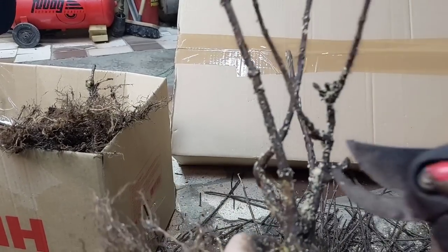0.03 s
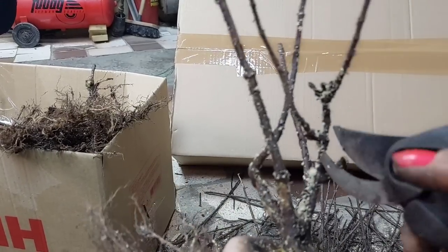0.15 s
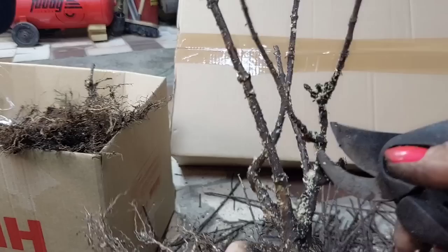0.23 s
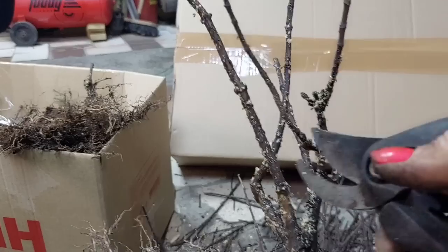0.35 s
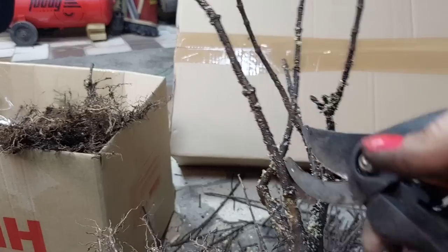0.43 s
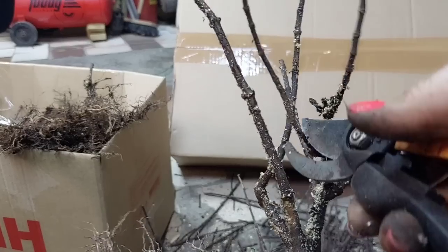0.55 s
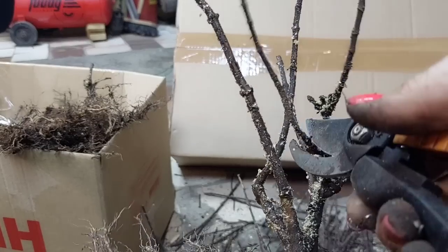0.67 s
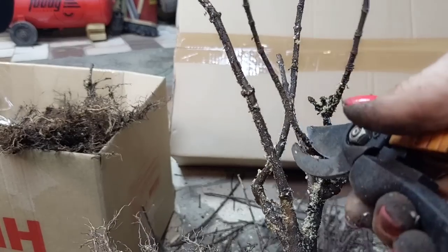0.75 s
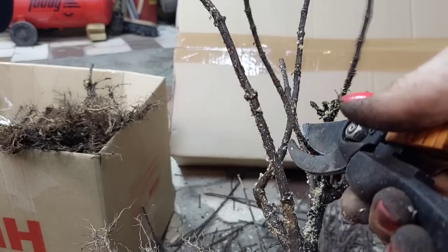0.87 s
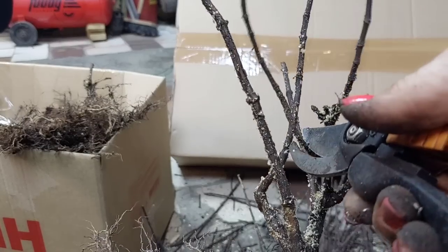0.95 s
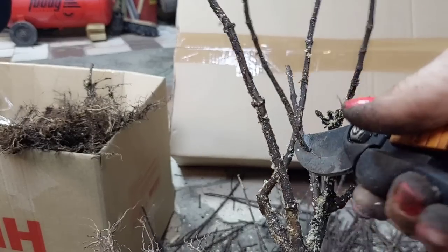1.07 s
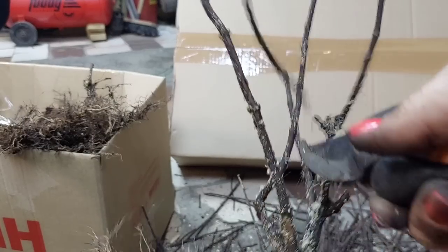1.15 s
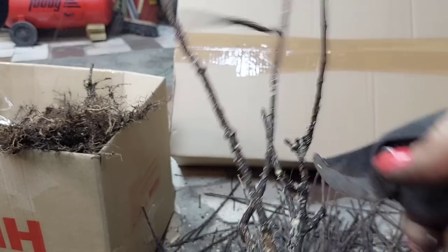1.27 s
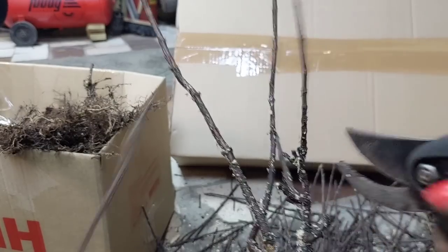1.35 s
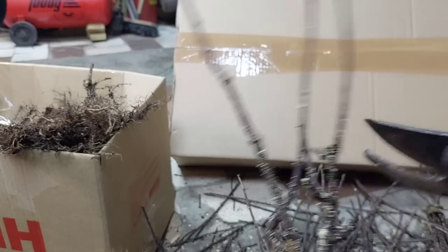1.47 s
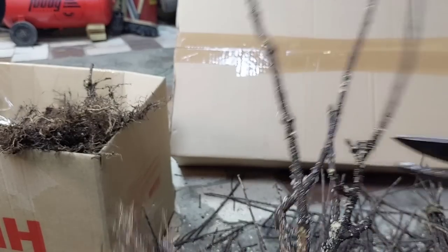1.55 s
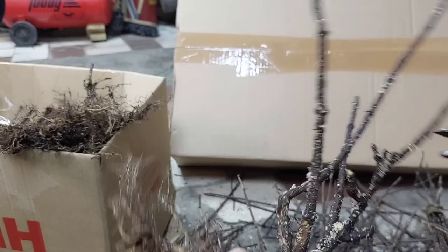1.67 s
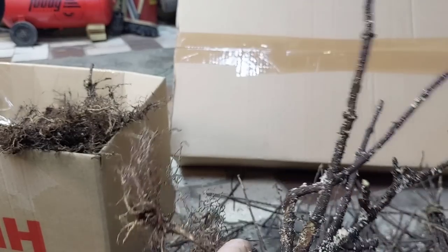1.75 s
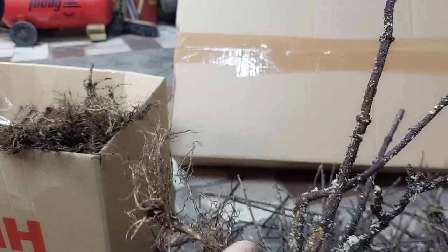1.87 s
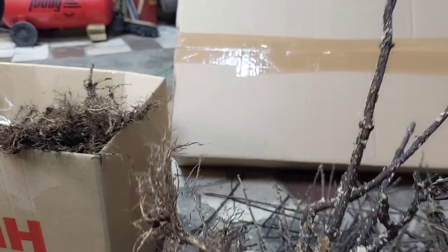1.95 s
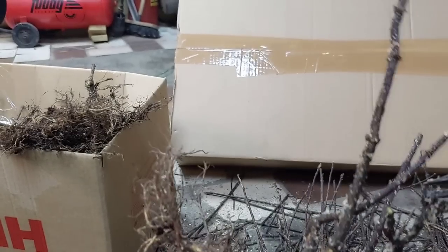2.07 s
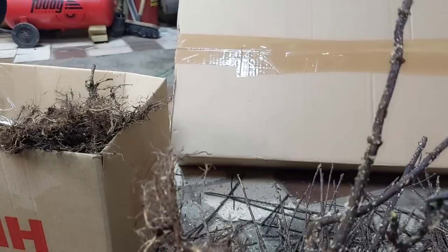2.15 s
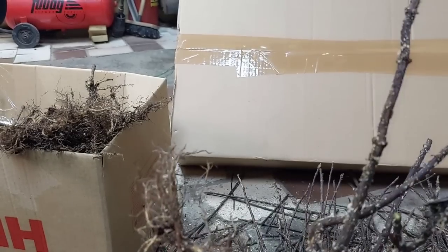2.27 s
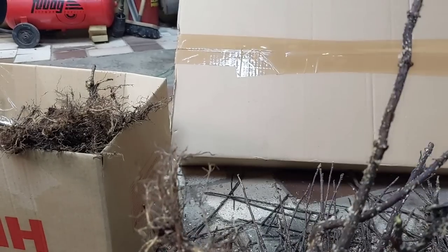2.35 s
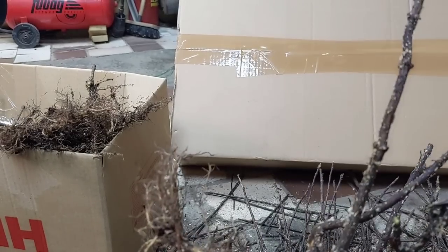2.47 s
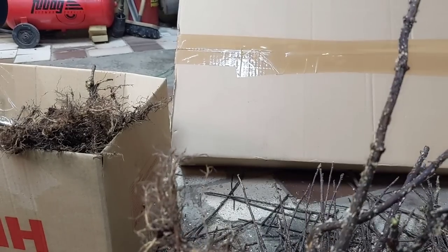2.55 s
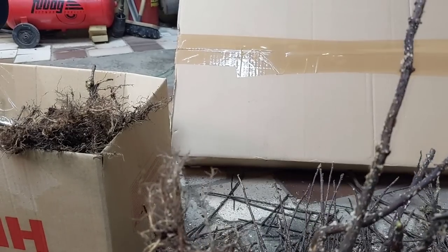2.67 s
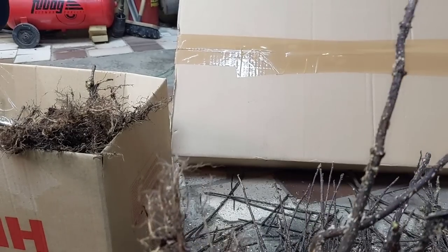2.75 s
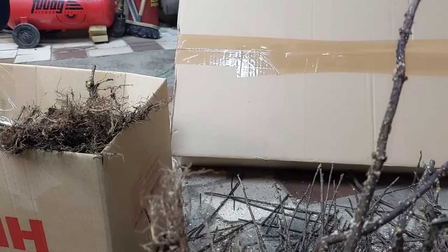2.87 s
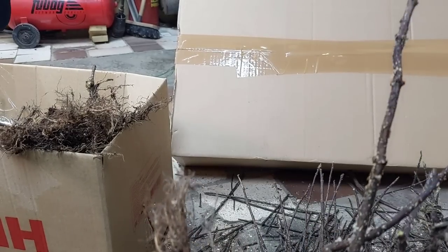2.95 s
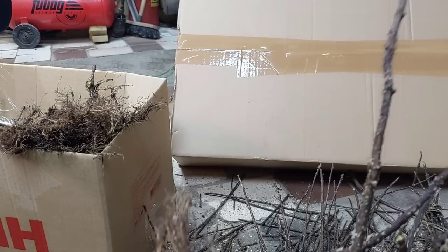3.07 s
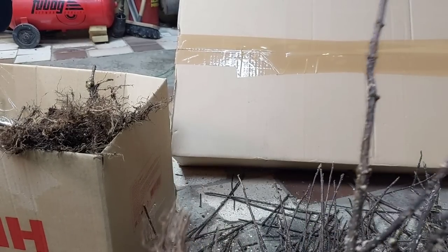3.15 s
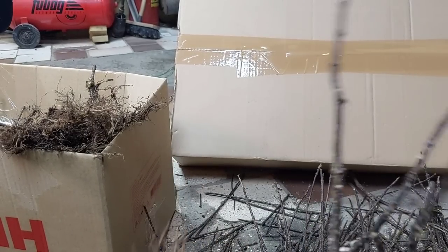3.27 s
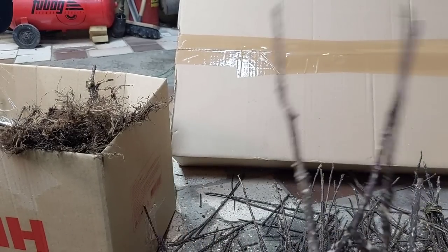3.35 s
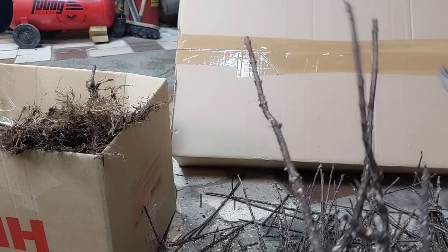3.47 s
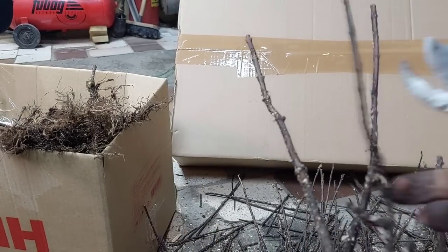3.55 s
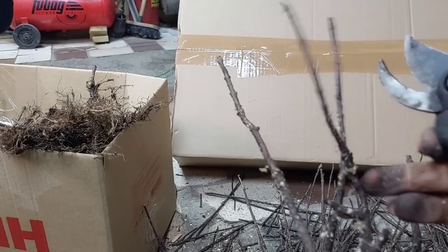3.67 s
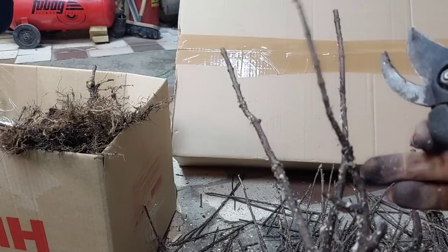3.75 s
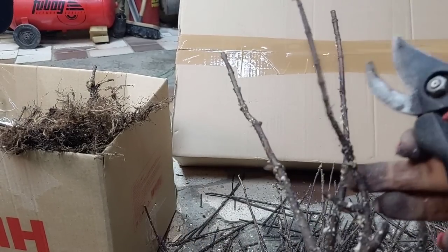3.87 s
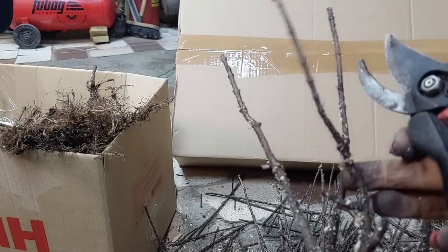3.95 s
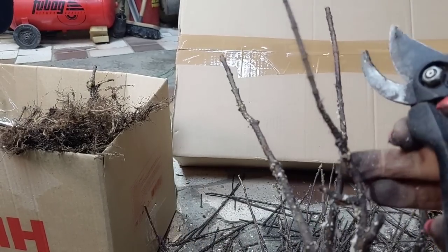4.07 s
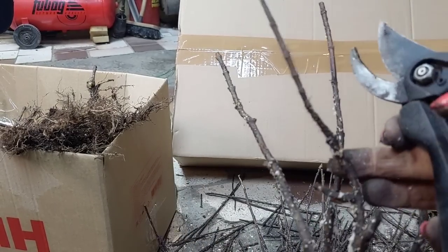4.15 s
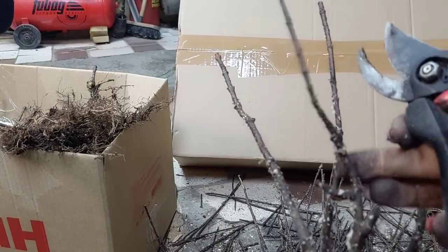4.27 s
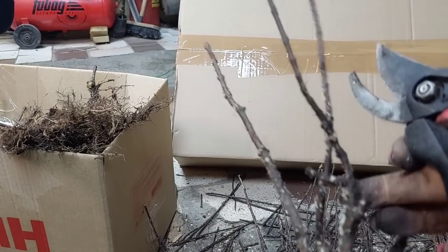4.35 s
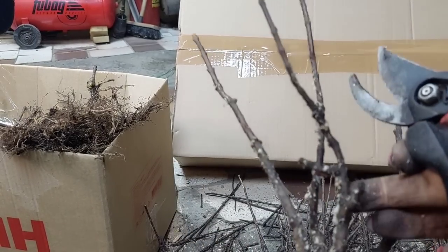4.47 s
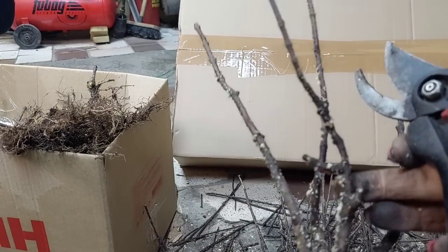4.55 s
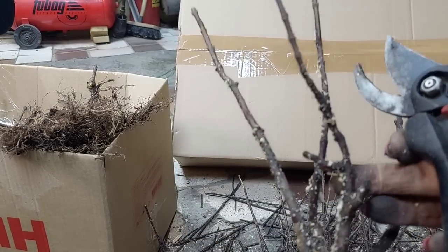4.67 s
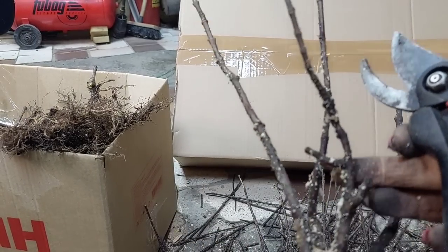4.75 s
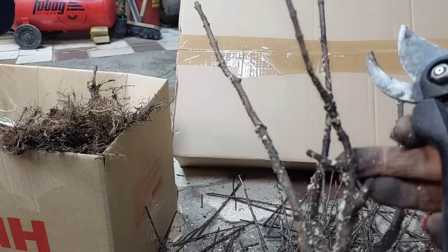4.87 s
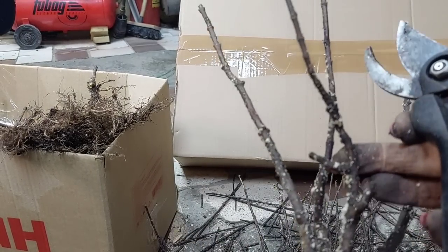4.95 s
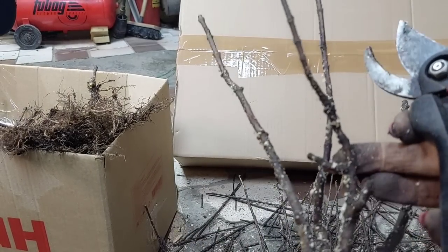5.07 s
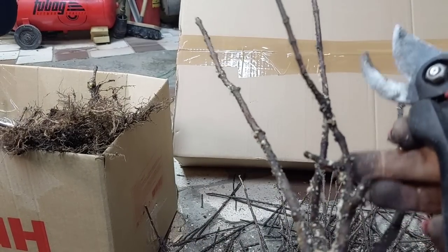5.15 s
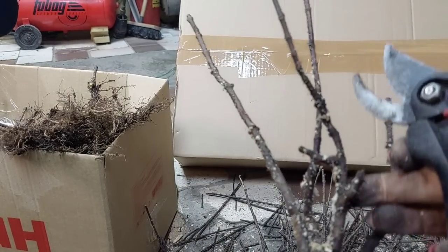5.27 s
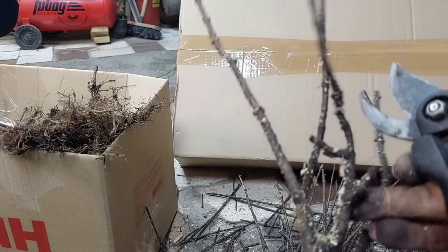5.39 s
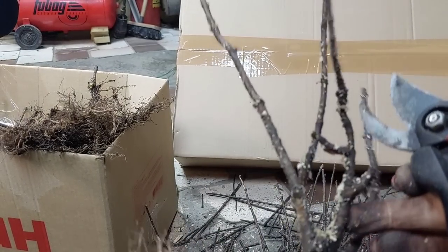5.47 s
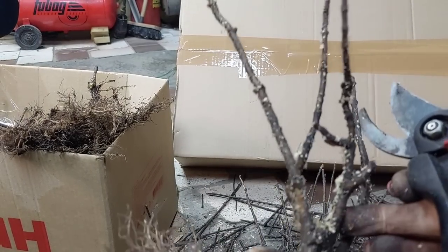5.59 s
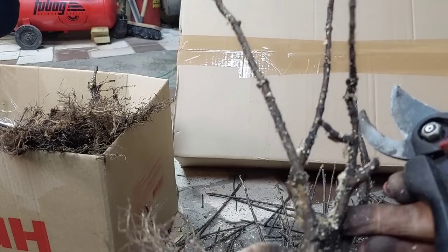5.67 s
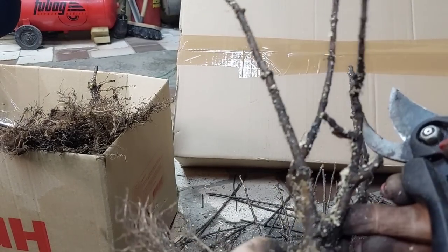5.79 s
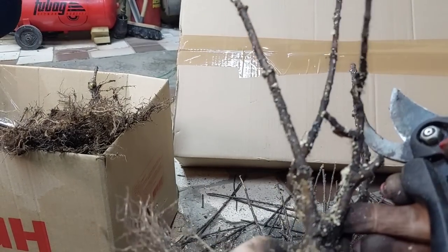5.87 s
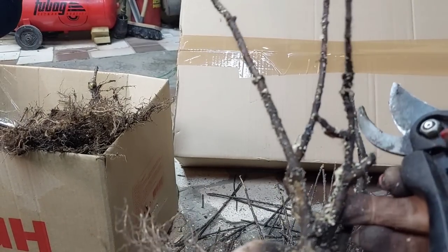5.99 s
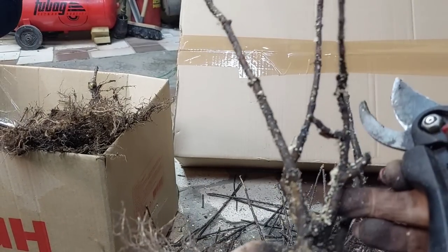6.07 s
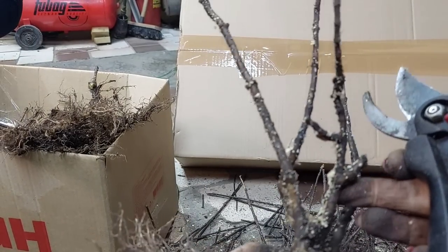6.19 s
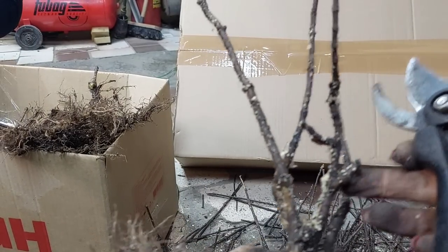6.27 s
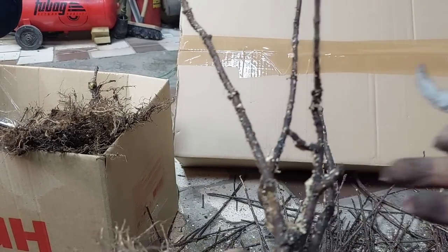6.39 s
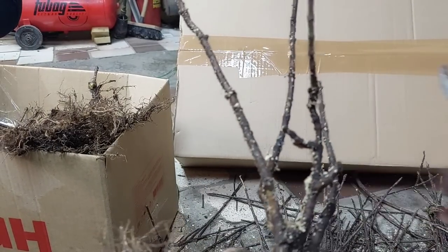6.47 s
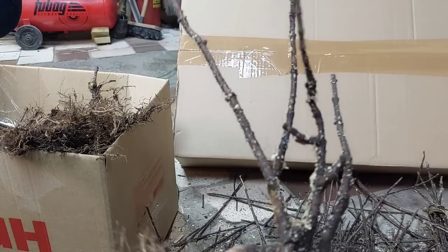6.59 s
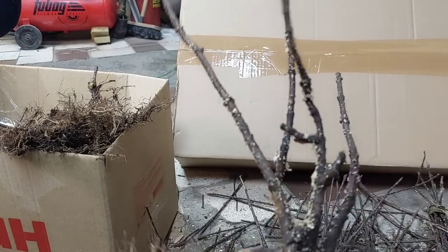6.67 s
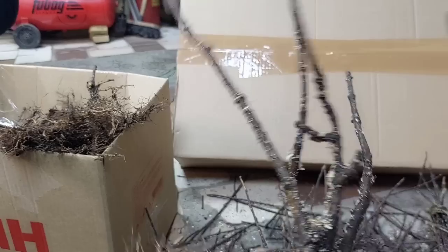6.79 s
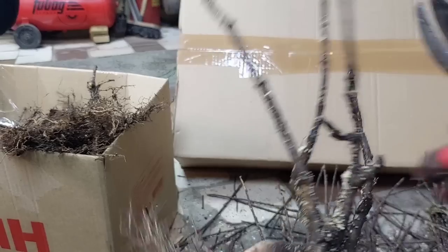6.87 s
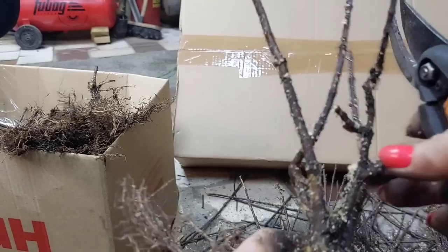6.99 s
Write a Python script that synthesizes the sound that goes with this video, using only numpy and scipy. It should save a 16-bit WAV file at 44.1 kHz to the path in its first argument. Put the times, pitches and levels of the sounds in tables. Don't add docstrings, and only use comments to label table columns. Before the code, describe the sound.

Pruners cut woody stems close by in a workshop with short reflections. A hard crack and clap comes first, by far the loudest, followed by a small springy scrape. Later a pair of lighter, brighter snips, soft twig rustle, a deep cardboard bump and a hissing, chattering drag of roots. Faint hum, rumble and thin hiss stay beneath.

```python
import sys
import numpy as np
from scipy import signal
from scipy.fft import rfft, irfft
from scipy.io import wavfile
from scipy.ndimage import uniform_filter1d

SR = 44100
rng = np.random.default_rng(int(sys.argv[2]) if len(sys.argv) > 2 else 0)


def waveform_to_disk(signal):
    frames = np.transpose(np.atleast_2d(signal))
    scaled = np.clip(frames, -1, 1) * 32767
    samples = np.round(scaled).astype(np.int16)
    wavfile.write(sys.argv[1], SR, samples)


def undo_db(level):
    steps = np.asarray(level, float) / 20
    return 10 ** steps


N = 309960


def rms_one(x):
    return x / np.sqrt(np.mean(x ** 2) + 1e-20)


def at_hz(points, hz):
    points = np.array(points)
    return np.interp(np.log(hz), np.log(points[:, 0] + 1e-9), points[:, 1])


def panned(db):
    return undo_db(np.array([db / 2, -db / 2]))


def band(x, low_hz, high_hz):
    sos = signal.butter(2, [low_hz, min(high_hz, .45 * SR)], "band", fs=SR, output="sos")
    return signal.sosfilt(sos, x)


def drift(rate_hz):
    r = np.exp(-80 * np.pi * rate_hz / SR)
    slow = signal.lfilter([1], [1, -2 * r, r * r], rng.standard_normal(N // 40 + 2002))[2000:]
    return np.interp(np.arange(N) / 40, np.arange(len(slow)), rms_one(slow))


def body(x, modes):
    out = 0
    for k, (hz, width_hz, db) in enumerate(modes):
        r = np.exp(-np.pi * max(width_hz, 5) / SR)
        a = [1, -2 * r * np.cos(2 * np.pi * hz / SR), r * r]
        out = out + (-1) ** k * undo_db(db) * signal.lfilter([1 - r, 0, r - 1], a, x)
    return out


def coloured(white, spectrum):
    hz = np.fft.rfftfreq(white.shape[-1], 1 / SR) + 1
    return rms_one(irfft(rfft(white) * undo_db(at_hz(spectrum, hz)), white.shape[-1]))


def add(out, x, s, lag_s):
    for side, late_s in enumerate((lag_s, 0)):
        i = round((s + late_s) * SR)
        out[side, i:i + x.shape[1]] += x[side, :N - i]


def swells(peak_s, db, rise_s, fall_s):
    late_s = np.arange(0, N + 16, 16) / SR - np.reshape(peak_s, (-1, 1))
    rise_s, fall_s = (np.maximum(np.reshape(v, (-1, 1)), .002) for v in (rise_s, fall_s))
    slope = np.where(late_s < 0, -late_s / rise_s, late_s / fall_s)
    return undo_db(np.reshape(db, (-1, 1)) - 20 * slope)


def summed(gains, pan_db=0.):
    sides = panned(np.zeros(len(gains)) + pan_db)[:, :, None]
    both = np.sqrt(np.sum((gains * sides) ** 2, axis=1))
    return np.array([np.interp(np.arange(N) / 16, np.arange(len(g)), g) for g in both])


# (frequency [Hz], level [dB per Hz])
LOW = [(15, -27), (30, -8), (60, -6.5), (100, -5.5), (134, -3), (175, -11.5), (250, -9), (330, -13),
       (450, -19), (600, -29), (800, -45.5), (1500, -100)]
# (frequency [Hz], level [dB per Hz])
HISS = [(300, -25), (550, -1), (900, -1), (1250, -4), (2000, -9), (3000, -12.5), (4500, -14.5), (6300, -15),
        (8200, -12.5), (10000, -15.5), (13000, -14), (16000, -15)]
# (frequency [Hz], left-right [dB])
LEAN = [(60, 13.5), (110, 11.5), (200, 8.5), (380, 6), (700, 0.5), (1290, 10.5), (2380, 13.5), (4400, 8.5),
        (8120, 1.5), (15000, -2)]
# (frequency [Hz], likeness [0 to 1])
LIKENESS = [(60, 0.97), (130, 0.35), (290, 0.26), (640, 0.78), (1410, 1), (3100, 0.89), (6820, 0.45),
            (15000, 0.55)]
# (peak time [s], level [dB], rise [s], fall [s])
SHAKES = [(3.59, -53, 0.019, 0.19), (3.7, -68, 0.11, 0.9), (4.475, -64, .015, 0.22), (4.63, -62.5, 0.18, 1),
          (5.05, -62.5, 0.48, 0.32), (.41, -66.5, 0.04, 0.34)]


def floor():
    hz = np.fft.rfftfreq(N, 1 / SR) + 1
    alike = np.clip(at_hz(LIKENESS, hz), 0, 1)
    mid, side = rfft(rng.standard_normal((2, N)))
    pair = np.sqrt(1 + alike) * mid + np.sqrt(1 - alike) * side * [[1], [-1]]
    pair = pair * panned(at_hz(LEAN, hz))
    low, hiss = (rms_one(irfft(pair * undo_db(at_hz(shape, hz)), N)) for shape in (LOW, HISS))
    shaking = np.hypot(undo_db(-71), summed(swells(*np.transpose(SHAKES))))
    rumble = shaking * undo_db(4.0 + 0.5 * drift(9.9)) * low
    return rumble + undo_db(-84.7 + 4.3 + .5 * drift(3)) * hiss


# (peak time [s], level [dB], rise and fall [s])
HUM = [(0.0, -56, 0.076), (.22, -55.5, 0.29), (.688, -57.5, 0.17), (1.08, -63, 0.43), (1.42, -67.5, 0.25),
       (1.7, -63, 0.47), (2.33, -63.5, 0.3), (2.58, -63, 0.29), (3.08, -59.5, .15), (3.33, -71.5, 0.38),
       (3.879, -67.5, 0.29), (4.324, -61.5, 0.19), (5.1, -55.5, 0.32), (5.63, -62, 0.1), (5.82, -67, 0.19),
       (6.268, -61.5, 0.46), (6.588, -59.5, .25), (7.029, -58.5, 0.31)]
# (frequency [Hz], width [Hz], level [dB])
HUM_MODE = [(66.5, 32, 0)]


def hum():
    white = rng.standard_normal((3, N))
    tone = body(body(white[0] + .5 * white[1:], HUM_MODE), HUM_MODE)
    strength = np.sqrt(uniform_filter1d(tone ** 2, size=4000) + 0.073 * np.mean(tone ** 2))
    s, db, width_s = np.transpose(HUM)
    level = np.hypot(summed(swells(s, db, width_s, width_s)), undo_db(-79))
    return level * undo_db(-1.5) * tone / strength * panned(7)[:, None]


# (time [s], pressure as bark level [dB])
HAUL = [
    [(4.462, -66), (4.474, -65), (4.6, -70), (4.74, -67), (4.9, -59.5), (5.08, -58), (5.15, -62.5),
     (5.2, -71), (5.45, -92)],
]
HAUL_MEAN_DB = -59


def hauled(db, follows):
    t, pressure_db = np.arange(N) / SR, np.full(N, -300.)
    for rows in HAUL:
        s, db_then = np.transpose(rows)
        on = (t > s[0] - .001) & (t < s[-1] + .001)
        pressure_db[on] = np.interp(t[on], s, db_then)
    pressure_db = uniform_filter1d(pressure_db, size=64)
    return undo_db(db + np.where(pressure_db > -100, follows, 1) * (pressure_db - HAUL_MEAN_DB))


# (frequency [Hz], level [dB per Hz])
DRAG = [(180, -70.5), (300, -23), (337, 12), (527, -1.5), (722, -2), (910, -4), (1330, -4), (2190, -5.5),
        (2500, -5), (2810, -6.5), (4850, -6.5), (7400, -23), (9500, -40.5), (11900, -37), (14500, -35)]


def grit(per_s, size_db):
    born = rng.random((2, N)) < per_s * undo_db(4 * drift(25)) / SR
    sizes = undo_db(size_db * np.minimum(rng.exponential(1, (2, N)), 4)) * rng.choice([-1, 1], (2, N))
    return coloured(rms_one(born * sizes) + 0.97 * rng.standard_normal((2, N)), DRAG)


# (peak time [s], bark level [dB], rise [s], fall [s], wood over bark [dB])
BRUSH = [(.778, -92, .012, 0.27, 0), (.952, -83.5, 0.2, 0.26, -6.5), (1.05, -81.5, .006, 0.32, 2),
         (1.123, -78.5, 0.27, 0.0055, -12), (1.51, -78.5, 0.029, 0.17, -4.5),
         (1.565, -74, 0.053, 0.053, -4), (2.841, -69.5, 0.004, 0.088, 4.5), (3.205, -85, 0.011, 0.33, 3),
         (3.269, -70.5, 0.12, .09, -3), (3.416, -85, 0.42, 0.28, -9), (3.63, -85, 0.11, 0.26, 5),
         (3.84, -89.5, 0.31, 0.35, 8.5), (4.169, -83.5, 0.053, 0.088, 14.5), (4.363, -72, 0.017, 0.59, -6),
         (4.456, -68.5, 0.12, 0.017, 4), (4.468, -67, .005, 0.096, 20), (5.55, -83.5, 0.15, .05, 0)]
# (peak time [s], level [dB], rise [s], fall [s], left-right [dB])
RUSTLES = [(.008, -78.5, 0.08, 0.3, 3.5), (.14, -81, 0.041, 0.37, -0.2), (1.92, -85, 0.02, .12, -7),
           (5.662, -86.5, 0.66, 0.29, -3.5), (5.86, -80, 0.24, .45, 2.5), (6.14, -81, 0.64, .2, 2.5),
           (6.33, -80, 0.36, 0.67, 3.5), (6.505, -74, 0.13, 0.15, -4), (6.7, -67.5, 0.2, 0.17, -4),
           (7.029, -78.5, 0.29, 0.11, -0.5)]
# (peak time [s], level [dB], rise [s], fall [s])
CHATTER = [(4.882, -50.5, .012, .04), (4.905, -49, 0.034, .03), (4.935, -55, .03, .02),
           (5.269, -61.5, 0.12, 0.038)]
# (frequency [Hz], width [Hz], level [dB])
CHATTER_MODES = [(710, 130, 12), (590, 100, -11.5)]
# (lowest [Hz], highest [Hz])
RUB_EDGES = [(450, 3000), (3000, 12000), (8500, 17000), (8500, 17000)]
RUB_TRIM_DB = [5, 1, 7]


def brushing():
    coarse, fine = grit(per_s=2000.0, size_db=2.5), grit(per_s=13000.0, size_db=1.5)
    layers = []
    for rub, edges, trim_db in zip((coarse, fine, coarse, fine), RUB_EDGES, [*RUB_TRIM_DB, 4]):
        layers.append(undo_db(trim_db) * rms_one(band(band(rub, *edges), *edges)))
    wood, bark, root, lone = layers
    s, db, rise_s, fall_s, woody_db = np.transpose(BRUSH)
    root_db = -77 + .7 * (db + 75)
    wood_gain = np.hypot(summed(swells(s, db + woody_db, rise_s, fall_s)), hauled(-54.5, .99))
    bark_gain = np.hypot(summed(swells(s, db, rise_s, fall_s)), hauled(HAUL_MEAN_DB, 0.93))
    root_gain = np.hypot(summed(swells(s, root_db, rise_s, fall_s)), hauled(HAUL_MEAN_DB - 4, 0.8))
    out = wood_gain * wood + bark_gain * bark + root_gain * root
    out = out + summed(swells(*np.transpose(CHATTER))) * rms_one(body(wood, CHATTER_MODES))
    *shape, pan_db = np.transpose(RUSTLES)
    rustle = summed(swells(*shape), pan_db) * lone
    return undo_db(0.3 * drift(36)) * (out * panned(1.5)[:, None] + rustle)


# (peak time [s], deep panel [dB], upper panels [dB], rise [s], fall [s])
BOOM = [(3.206, -68, -55, 0.0081, 0.097), (3.25, -72.5, -54, 0.072, 0.043), (3.591, -38, -64, 0.014, 0.15),
        (3.62, -57.5, -56, .05, 0.11), (3.67, -48, -61, 0.052, 0.039), (3.89, -66, -63, 0.11, .13),
        (4.44, -49, -55.5, 0.056, .1), (4.468, -27, -30, 0.0037, 0.1), (4.495, -38, -25.5, 0.012, 0.049),
        (4.551, -32.5, -40.5, 0.069, 0.037), (4.63, -50.5, -51.5, 0.02, 0.11),
        (4.914, -52.5, -66, 0.091, 0.085), (5.08, -40.5, -54, 0.069, 0.078), (5.18, -60, -72, 0.034, 0.12),
        (5.29, -66, -58, 0.15, 0.092)]
# (frequency [Hz], width [Hz], level [dB])
DEEP_PANEL = [(134, 11.3, 6), (180, 99, -11)]
# (frequency [Hz], width [Hz], level [dB])
UPPER_PANELS = [(257, 103, -5.5), (346.3, 33.3, 1), (423, 34, -13.5), (551.3, 10.3, -5), (710, 650, -18)]


def box_boom():
    s, deep_db, upper_db, rise_s, fall_s = np.transpose(BOOM)
    dragged = hauled(-59.5, follows=.49)
    out = 0
    for modes, db, drag in ((DEEP_PANEL, deep_db, 0), (UPPER_PANELS, upper_db, dragged)):
        white = rng.standard_normal((3, N))
        panel = band(body(white[0] + 0.51 * white[1:], modes), 72, 950)
        level = np.hypot(summed(swells(s, db, rise_s, fall_s)), drag)
        out = out + undo_db(-3.0) * level * rms_one(panel)
    return out * panned(1.0)[:, None]


# (time [s], peak level [dB], pitch [Hz], left-right [dB])
TICKS = [(0.1402, -69, 6100, 9), (0.4644, -64.5, 10000, 4), (0.555, -63.5, 8220, 10),
         (0.775, -66, 7860, 3.0), (0.925, -65.5, 6800, 16), (1.05, -50, 7140, 11), (1.07, -54.5, 5400, -3),
         (1.4956, -56, 4010, -4), (1.5597, -53.5, 6900, -2), (1.9166, -68, 11890, -15),
         (3.2037, -61, 12800, 2.5), (3.218, -54, 4855, -5), (3.726, -60.5, 9440, -2)]


def ticks():
    out, t = np.zeros((2, N)), np.arange(400) / SR
    for s, db, hz, pan_db in TICKS:
        click = rng.standard_normal((2, len(t))) * undo_db(-60 * t / 0.0098)
        tick = body(click, [(hz, .5 * hz, 0)]) + 0.16 * band(click, 3600, 13000)
        add(out, undo_db(db + 3.0) * tick / np.abs(tick).max() * panned(pan_db)[:, None], s, 0)
    return out


# (time [s], peak level [dB], time to fade 60 dB [s], left-right [dB])
KNOCKS = [(1.1496, -17, 0.05, -3.5), (2.9655, -52, 0.076, 0.1), (3.026, -38, 0.039, 5.5)]
# (frequency [Hz], level [dB per Hz])
KNOCK = [(25, -55), (50, -18), (80, -4), (125, -1), (180, -4), (330, 0), (470, -19), (590, -12), (780, -26),
         (2500, -90)]


def knocks():
    out, t = np.zeros((2, N)), np.arange(SR // 3) / SR
    for s, db, t60_s, pan_db in KNOCKS:
        white = rng.standard_normal((3, len(t)))
        thud = coloured(white[0] + 0.095 * white[1:], KNOCK)
        thud = thud * undo_db(-60 * t / t60_s) * (1 - np.exp(-t / 0.0039))
        add(out, undo_db(db) * thud / np.abs(thud).max() * panned(pan_db)[:, None], s, 0)
    return out


# (time [s], frequency [Hz], width [Hz], level [dB], fall by 20 dB [s], held within 0.005
RINGS = [(1.156, 1230, 120, -46.5, 0.1), (1.156, 2160, 200, -44.5, -1.5), (1.156, 2390, 59.9, -48.5, 0.3),
         (1.156, 3450, 160, -52, 6), (1.152, 93, 40, -40.5, 1), (1.152, 380, 90, -30.5, 0.1),
         (1.156, 4502, 120, -51.5, 0.7), (1.315, 2330, 149.6, -62, -1.5), (1.316, 1300, 200.4, -62, .05),
         (2.842, 3120, 300, -61, .04), (1.156, 5450, 400, -46, 0), (2.84, 5000, 900, -63.5, 0),
         (3.03, 2210, 90, -44, -0.5), (3.03, 5170, 299, -56.5, 7), (3.022, 2240, 150, -40, 0.3),
         (3.025, 4750, 350, -30.5, -0.33), (3.203, 798, 498, -60.5, 0.5), (3.243, 2250, 253, -58.5, -0.1),
         (3.243, 5000, 499, -52.5, -1.2), (4.47, 590, 100, -42, -2), (4.48, 200, 50, -38, -4),
         (4.92, 2600, 200, -58, .06), (5.04, 2510, 200, -55, .06), (5.07, 1340, 120, -50, .05),
         (4.469, 960, 200, -44, -1.5), (4.47, 85, 30, -48, .1)]


def rings():
    out, t = np.zeros((2, N)), np.arange(SR // 4) / SR
    for s, hz, width_hz, db, fall_s in RINGS:
        white = rng.standard_normal((3, len(t)))
        tone = rms_one(body(white[0] + 0.98 * white[1:], [(hz, width_hz, 0)]))
        fade = undo_db(db - 20 * t / np.clip(fall_s, .005, .065)) * (1 - np.exp(-t / .003))
        add(out, fade * tone, s, 0)
    return out


# (frequency [Hz], width [Hz], level [dB])
BRIGHT = [(8555, 1200, -7), (10900, 1800, -4), (12800, 5000, 0), (14400, 3100, -3), (15300, 2200, -7.5)]
# (lowest [Hz], highest [Hz])
PART_EDGES = [(1050, 2700), (3000, 7500), (7500, 16500)]
# (frequency [Hz], width [Hz], level [dB])
BLADE = [(3600, 1100, -9), (4750, 650, 1), (5400, 280, -3), (6900, 300, -4), (8373, 600, -14.5)]


def pruner(size, fade, alike, fill_db, strike, stem, blade=BLADE, pitch=1):
    parts = []
    for modes, edges in zip((stem, np.array(blade) * [pitch, 1, 1], BRIGHT), PART_EDGES):
        fibres = rng.standard_normal((2, 3, size)) * undo_db(2.0 * rng.standard_normal(size)) * fade
        blow = strike * (np.arange(size) == 0)
        ringing, crack = alike * fibres[:, :1] + fibres[:, 1:] + blow
        part = rms_one(body(ringing, modes)) + undo_db(fill_db) * rms_one(band(crack, *edges))
        lowest_hz = .85 * edges[0]
        parts.append(rms_one(band(band(part, lowest_hz, 17000), lowest_hz, 19000)))
    return parts


# (peak time [s], stem [dB], blade [dB], bright [dB], left-right [dB])
OPENING = [(1.327, -66, -68.5, -71, 3.5), (1.338, -52, -57, -66, -11), (1.343, -56, -58, -59, 1),
           (1.348, -48.5, -55, -58.5, -3.5), (3.242, -71, -64.5, -64, -3), (3.251, -68, -63, -63, -8),
           (3.259, -66, -65, -69, -6)]
# (frequency [Hz], width [Hz], level [dB])
HINGE = [(1250, 140, -2), (1510, 340, 2), (2330, 150, 3.5), (1900, 460, -18)]


def opening():
    parts = pruner(N, 1, alike=0.46, fill_db=-7.0, strike=0, stem=HINGE)
    s, *levels_db, pan_db = np.transpose(OPENING)
    slide = swells(s, 7.2, rise_s=0.0053, fall_s=0.0054)
    settle = swells(s, -13.5, rise_s=0.0053, fall_s=0.07)
    out = 0
    for db, part in zip(levels_db, parts):
        out = out + summed((slide + settle) * undo_db(db)[:, None], pan_db) * part
    return out


# (time [s], stem [dB], blade ring [dB], bright crack [dB], length [ms])
SNAPS = [(1.1359, -27, -26.5, -36, 1.3), (1.141, -44, -36, -41.5, 1.6), (1.1489, -8, -11.5, -20, 2.7),
         (1.1522, -3.5, 0, -6.5, 1.0), (1.1544, -17, -23, -35, 6.5), (2.836, -59, -58.5, -76, 26.2),
         (2.9647, -35, -21, -12.5, .75), (2.9665, -34.5, -38.5, -36.5, 8.5),
         (2.9703, -49, -31.5, -43.5, 2.297), (3.0200, -32, -38.5, -44, 13), (3.0227, -37.5, -27, -30, 6),
         (3.0266, -23.5, -10, -21, 2.3), (3.0281, -25, -20, -19, 8.5), (4.4656, -36.5, -52, -34, 5.8)]
# (time [s], left-right [dB], blade pitch [share of the usual])
PRUNER_SIDE = [(1.15, -2, 1.001), (2.84, 3.5, .98), (2.96, -6.5, 1.04), (3.03, -4.5, 0.99), (4.47, 7, 1.09)]
# (frequency [Hz], width [Hz], level [dB])
STEM = [(1235, 170, -1), (1620, 250, 0.5), (1800, 350, -3), (2305.5, 250, -.5)]
# (frequency [Hz], width [Hz], level [dB])
THIN_STEM = [(1196.4, 200, -4), (1600, 300, -12.5), (2250, 220, -0.5), (2600, 300, -9.5)]
# (frequency [Hz], width [Hz], level [dB])
THICK_BLADE = [(3670, 400, -6), (4230, 400, -9.5), (5450, 1500, -0.5), (6120, 630, -5.5),
               (8900, 940, -11.5)]


def snaps():
    out, t = np.zeros((2, N)), np.arange(1800) / SR
    held_s, held_pan_db, held_pitch = np.transpose(PRUNER_SIDE)
    lags_s = .00017, .00036, .00036
    for s, *levels_db, ms in SNAPS:
        pan_db, pitch = np.interp(s, held_s, held_pan_db), np.interp(s, held_s, held_pitch)
        stem = THIN_STEM if 2 < s < 4 else STEM
        blade = THICK_BLADE if s < 2 else BLADE
        fade = undo_db(-20 * t / (max(ms, .3) / 1000))
        parts = pruner(len(t), fade, alike=1, fill_db=-4.5, strike=8.5, stem=stem, blade=blade, pitch=pitch)
        for db, part, lag_s, lean_db in zip(levels_db, parts, lags_s, (0, 0, -4)):
            burst = undo_db(db) * part / np.abs(part).max() * panned(pan_db + lean_db)[:, None]
            add(out, burst, s, lag_s * np.sign(-pan_db))
    return out


# (frequency [Hz], time [s])
ROOM_T60 = [(200, .28), (600, .25), (1500, .225), (4000, .2), (10000, .185)]
# (frequency [Hz], level [dB])
ROOM_LEVEL = [(200, -6.5), (600, -4), (1500, -5.5), (3000, 1.5), (6000, -4), (10000, -2), (15000, -3)]


def workshop(x):
    t, edges = np.arange(SR // 2) / SR, 100 * 2 ** np.arange(0, 7.6, 1 / 3)
    white, echo = rng.standard_normal((2, 2, len(t))), 0
    late_tail = undo_db(-22 - 60 * t / .42)
    for k, (low_hz, high_hz) in enumerate(zip(edges, edges[1:])):
        hz = np.sqrt(low_hz * high_hz)
        fade = undo_db(-60 * t / at_hz(ROOM_T60, hz)) + late_tail
        echo = echo + band(white[k % 2], low_hz, high_hz) * undo_db(at_hz(ROOM_LEVEL, hz)) * fade
    echo = echo * np.clip((t - .001) / .004, 0, 1)
    return signal.fftconvolve(x, echo / np.sqrt(np.sum(echo ** 2) / 2), axes=1)[:, :N]


def scene():
    background = floor() + hum()
    soft = brushing() + box_boom() + rings() + opening()
    sharp = ticks() + knocks() + snaps()
    return background + soft + sharp + undo_db(-16) * workshop(sharp)


def low_pass(x):
    return signal.sosfilt(signal.butter(12, 17150, fs=SR, output="sos"), x)


def record(dry):
    dry = dry / (1 + (dry / 1.05) ** 4) ** .25
    low, top = (signal.sosfilt(signal.ellip(10, .5, 70, 15550, kind, fs=SR, output="sos"), dry)
                for kind in ("low", "high"))
    top = signal.sosfilt(signal.ellip(8, .5, 60, 16900, fs=SR, output="sos"), top)
    gate = np.clip(uniform_filter1d(np.abs(top), size=90) / .002 - 1, 0, 1)
    return low_pass(low + gate * top)


dry = scene()
out = record(dry)
waveform_to_disk(out)
```